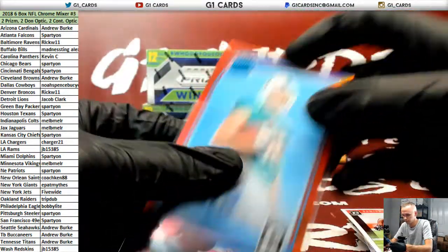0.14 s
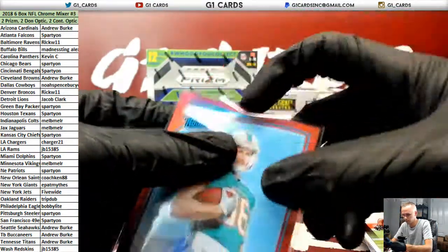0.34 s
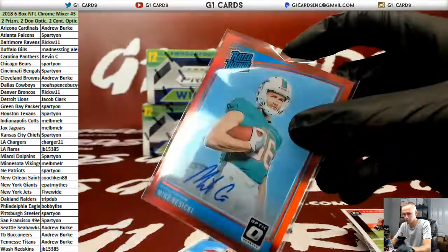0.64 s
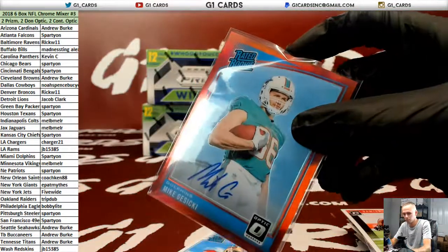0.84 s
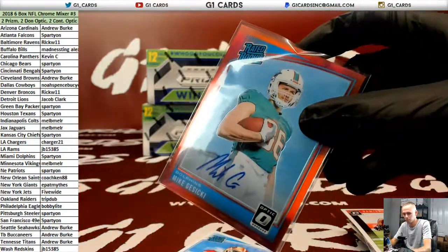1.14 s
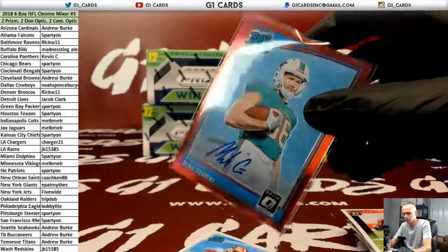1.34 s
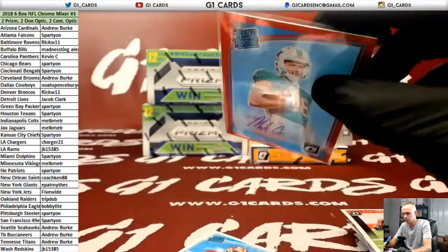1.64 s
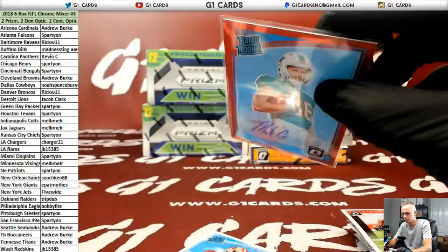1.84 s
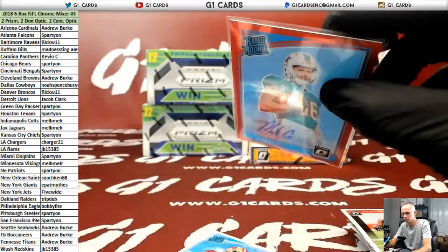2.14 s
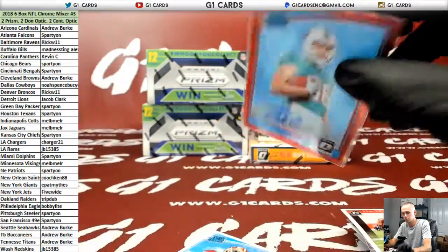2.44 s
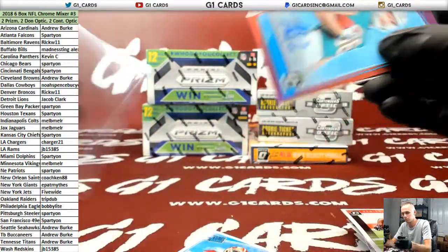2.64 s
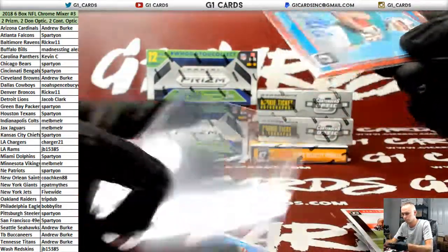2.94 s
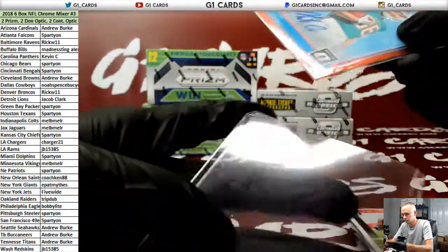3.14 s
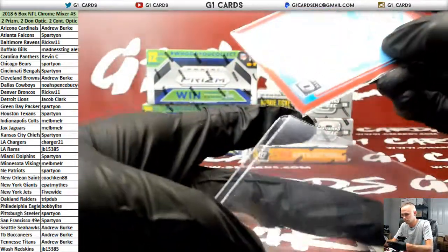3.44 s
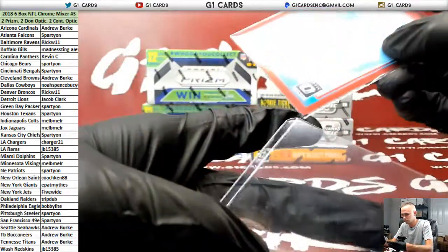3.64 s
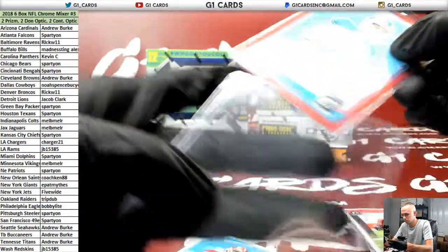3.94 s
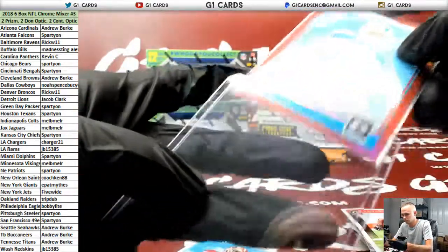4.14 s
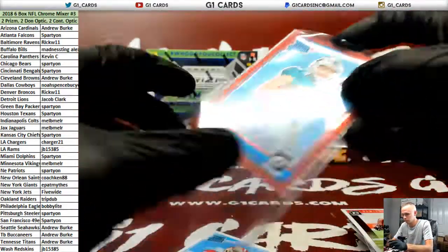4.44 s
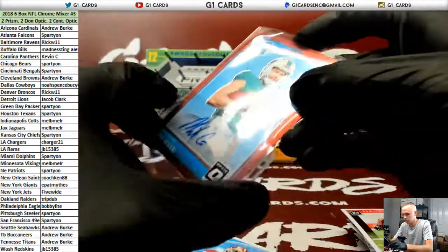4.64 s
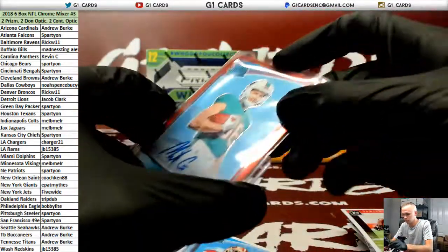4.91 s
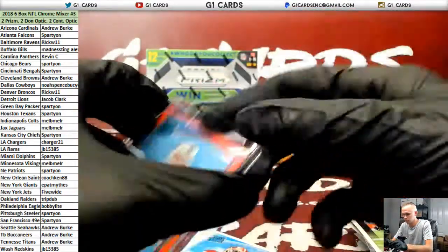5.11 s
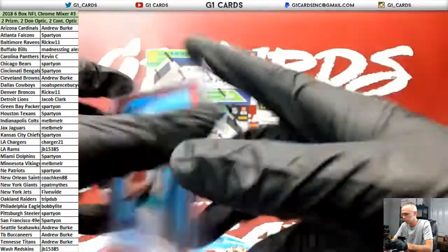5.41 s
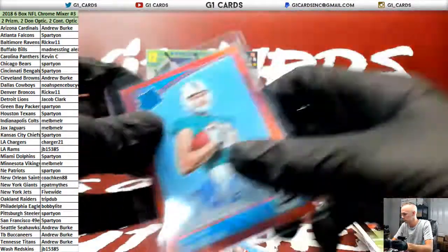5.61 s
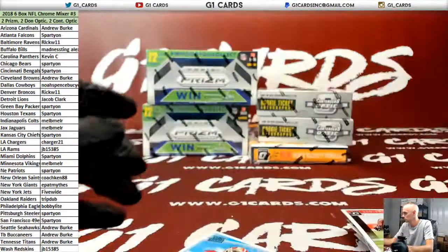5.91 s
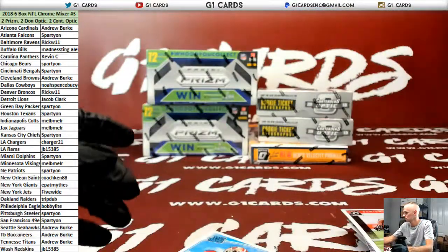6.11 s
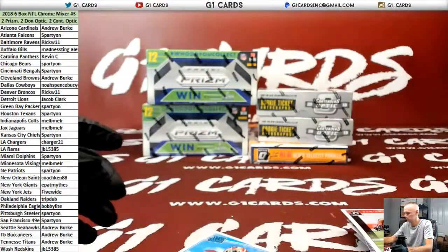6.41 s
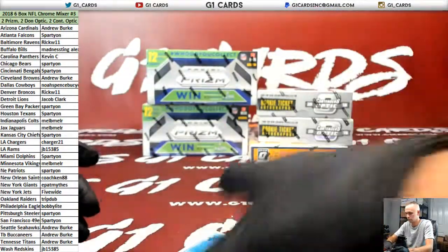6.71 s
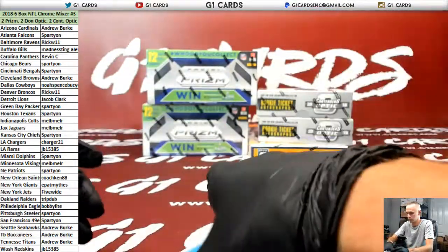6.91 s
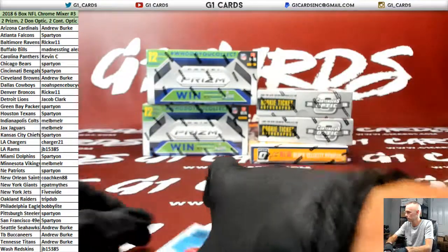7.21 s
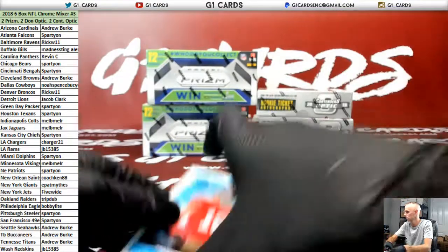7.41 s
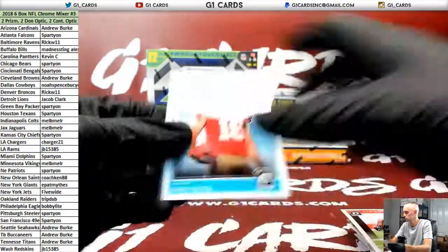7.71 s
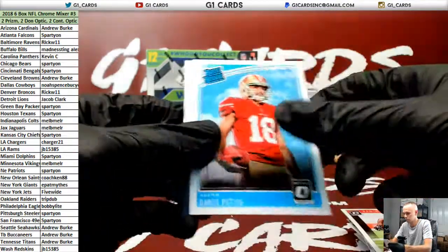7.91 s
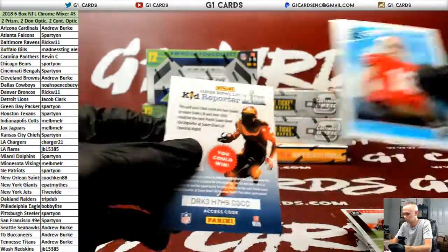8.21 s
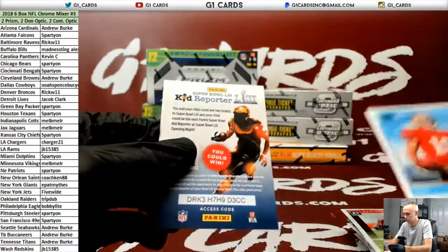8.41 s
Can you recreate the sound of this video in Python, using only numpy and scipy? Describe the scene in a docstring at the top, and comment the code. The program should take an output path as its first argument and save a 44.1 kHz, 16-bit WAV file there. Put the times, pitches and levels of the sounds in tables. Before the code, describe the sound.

Gloved hands softly handle a sleeved card over a fan's rumble; a rigid holder clacks down, and later a card snaps onto a pile.

```python
"""Soft plastic rustles and light ticks over a fan's low rumble and hum, close up in a small room.
Gloved hands are sliding a sleeved card into a rigid holder: friction makes the rustle, scrapes and
squeaks, and edges tick as they catch and let go. At about 6.1 s the holder clacks onto the table;
at about 8.5 s a card snaps down on a pile. Each landing is a quick run of contacts that ring the
object, thud into what lies beneath and echo round the room."""
import sys
import numpy as np
from scipy import signal
from scipy.fft import rfft, irfft, next_fast_len
from scipy.io import wavfile
from scipy.ndimage import uniform_filter1d, map_coordinates

SR = 44100
rng = np.random.default_rng(int(sys.argv[2]) if len(sys.argv) > 2 else 0)


def wrap_up_sound(samples):
    """Save the sound to the file named by the first command line argument, as 16-bit audio."""
    columns = np.atleast_2d(samples).T
    # keep every value between -1 and 1, then stretch to whole-number steps
    tamed = np.clip(columns, -1, 1)
    steps = np.round(tamed * 32767).astype(np.int16)
    wavfile.write(sys.argv[1], SR, steps)


N = 377496
TOP_HZ = 15800  # upper edge of the sound


def amp(db):
    """Decibels to gain."""
    return 10 ** (np.asarray(db) / 20)


def unit(x):
    """Scale to rms 1."""
    return x / np.sqrt(np.mean(x ** 2) + 1e-20)


def along(points, hz):
    """Read a curve of (freq_hz, value) points on a log-frequency axis."""
    freqs, values = np.transpose(points)
    return np.interp(np.log(hz + 1), np.log(freqs + 1), values)


def wobble(knots_per_s):
    """A smooth random drift."""
    knots = rng.standard_normal(int(N * knots_per_s / SR) + 4)
    return map_coordinates(knots, [np.arange(N) * knots_per_s / SR])


def filtered(x, response):
    """EQ x with a gain given as a function of frequency."""
    size = next_fast_len(len(x) + 4096)
    return irfft(rfft(x, size) * response(np.fft.rfftfreq(size, 1 / SR)), size)[:len(x)]


def coloured(x, spectrum):
    """EQ x with a curve of (freq_hz, gain_db) points, then scale to rms 1."""
    return unit(filtered(x, lambda hz: amp(along(spectrum, hz))))


def hump(hz, centre_hz, octaves):
    """A broad peak on the log-frequency axis."""
    return 1 / (1 + (np.log2((hz + 1) / centre_hz) / octaves) ** 2)


def add(track, start_s, sound):
    """Mix a sound into the track."""
    part = track[round(start_s * SR):][:len(sound)]
    part += sound[:len(part)]


def friction(slips_per_s, hiss):
    """Tiny slips of very uneven size over a smooth hiss."""
    slips = rng.laplace(size=N) * (rng.random(N) < slips_per_s / SR)
    return unit(unit(slips) + hiss * rng.standard_normal(N))


# Tone of the fan's rumble: freq_hz, gain_db
FAN_EQ = [(15, -6), (25, 0.5), (38, 0.5), (54, -11), (72, -6.5), (92, -14), (116, -8), (160, -17.5),
          (370, -20.5), (580, -30), (1300, -33.5), (2400, -40), (4000, -47), (16000, -58)]
# Resonances of the moving air: centre_hz, level_db, width_octaves
AIR_RESONANCES = [(436, -75.5, 0.071), (822, -74.5, 0.33)]
# Tones of the hum: pitch_hz, level_db
HUM_TONES = [(113, -67.5), (121, -70), (382, -71.5)]

def fan():
    """The bed: steady air rumble, two airy resonances and a wavering hum."""
    t = np.arange(N) / SR
    rumble = amp(-53) * coloured(rng.standard_normal(N), FAN_EQ)
    air = sum(amp(db) * unit(filtered(rng.standard_normal(N), lambda hz: hump(hz, centre_hz, octaves)))
              for centre_hz, db, octaves in AIR_RESONANCES)
    hum = sum(amp(db + 1.98 * wobble(1.5)) * np.sin(2 * np.pi * hz * t + 1.01 * wobble(9))
              for hz, db in HUM_TONES)
    return rumble + air + hum


# How long the walls ring: freq_hz, t60_s
WALL_DECAY = [(100, 0.77), (1200, 0.56), (6000, 0.5), (15000, 0.49)]

def room_tail(eq, near_t60_s, far_db, build_s):
    """Dense echoes from the desk and boxes, then the weaker ring of the walls; energy 1."""
    hz, t, spectrogram = signal.stft(rng.standard_normal(SR // 2), SR, nperseg=256)
    near = amp(-60 * t / near_t60_s)
    walls = amp(far_db - 60 * t / along(WALL_DECAY, hz)[:, None])
    tail = coloured(signal.istft(spectrogram * (near + walls), SR, nperseg=256)[1], eq)
    tail *= 1 - np.exp(-(np.arange(len(tail)) / SR / build_s) ** 2)
    return tail / np.linalg.norm(tail)


# Tone of the reverb on the handling: freq_hz, gain_db
ROOM_EQ = [(300, -3), (1500, 8.5), (3000, 2), (4800, 4.5), (7000, 5.5), (15000, 2.5)]

def in_room(x, wet_db):
    """A close sound with the small room's answer."""
    tail = room_tail(ROOM_EQ, near_t60_s=0.25, far_db=-17, build_s=0.0023)
    return x + amp(wet_db) * signal.fftconvolve(x, tail)[:N]


# Restless shifting of the grip between strokes: time_s, level_db
FIDGET = [(0, -79.5), (0.4, -73), (0.9, -84), (1.35, -74.5), (1.6, -82), (1.95, -75), (2.45, -69),
          (2.8, -74), (3.2, -90), (3.7, -88), (4.2, -70.5), (5.15, -81.5), (5.8, -70.5), (6.1, -79),
          (6.6, -76), (7.0, -76.5), (7.4, -73.5), (7.9, -81)]
# A glove brushes plastic or card: peak_s, level_db, half_width_s
GLOVE_STROKES = [(0.562, -70, .075), (0.70, -65.5, 0.012), (1.78, -73, 0.09), (2.094, -65.5, 0.037),
                 (2.232, -59, 0.025), (2.567, -65, 0.041), (3.01, -71, 0.032), (4.442, -67.5, 0.038),
                 (5.028, -62.5, .058), (5.332, -64, 0.056), (5.48, -65.5, 0.046), (5.59, -69, 0.027),
                 (6.774, -63.5, 0.026), (7.175, -72.5, .09), (7.292, -59.5, 0.035), (7.345, -63.5, 0.055),
                 (8.035, -71, 0.046), (8.099, -61, 0.02), (8.24, -72.5, 0.086)]

def glove_envelope():
    """Each stroke swells and fades as the finger speeds up and stops; its power adds to the fidgeting."""
    t = np.arange(N) / SR
    power = amp(np.interp(t, *np.transpose(FIDGET))) ** 2
    for peak_s, db, half_width_s in GLOVE_STROKES:
        power += (amp(db) * np.exp(-((t - peak_s) / half_width_s) ** 2)) ** 2
    return np.sqrt(power)


# The soft sleeve slides along a surface: start_s, length_s, level_db
SLEEVE_SLIPS = [(0.054, .12, -70), (1.72, .4, -80), (2.2, .44, -78), (3.77, .17, -70), (4.068, .11, -66),
                (4.28, .2, -80), (4.95, 0.14, -66), (5.395, .105, -75), (5.555, .07, -73),
                (6.75, .055, -71), (7.035, .2, -79), (7.27, .11, -67.5), (8.003, .11, -75)]

def sleeve_envelope(attack_s=0.012, release_s=0.009):
    """The sleeve starts to slide, keeps an even speed and stops short."""
    out, t = np.zeros(N), np.arange(SR) / SR
    for start_s, length_s, db in SLEEVE_SLIPS:
        release = np.exp(-np.maximum(t - length_s, 0) / release_s)
        add(out, start_s, amp(db) * (1 - np.exp(-t / attack_s)) * release)
    return out


def crinkled(x, depth_db):
    """Thin film buckles in patches, so single pitches flare up for a few milliseconds."""
    spectrogram = signal.stft(x, nperseg=256)[2]
    patches = uniform_filter1d(rng.standard_normal(spectrogram.shape), size=4, axis=0)
    patches = unit(uniform_filter1d(patches, size=4, axis=1))
    return unit(signal.istft(spectrogram * amp(depth_db * patches), nperseg=256)[1][:N])


# Midrange rub of the gloves and airy sizzle of the sleeve: freq_hz, gain_db
RUB_EQ = [(400, -17), (1200, 0), (2000, -2), (2900, -1), (4800, -2.5), (7000, -1.5), (9500, -11),
          (15000, -25.5)]
SLEEVE_EQ = [(4000, -36.5), (8000, -3), (11000, -5.5), (14000, -5.5), (16000, -8)]

def rustle(sleeve_drag_db=-6):
    """Grainy friction of gloves, with the finer crackle of the sleeve, which every glove move stirs."""
    glove_motion = glove_envelope()
    sleeve_motion = np.hypot(sleeve_envelope(), amp(sleeve_drag_db) * glove_motion)
    glove = crinkled(coloured(friction(slips_per_s=900, hiss=1), RUB_EQ), depth_db=3.5)
    sleeve = crinkled(coloured(friction(slips_per_s=800, hiss=1), SLEEVE_EQ), depth_db=4.5)
    flutter = amp(0.46 * wobble(60))
    return (amp(-2.5) * glove_motion * glove + amp(-4.7) * sleeve_motion * sleeve) * flutter


# Card edges scrape on plastic and each other: peak_s, level_db, half_width_s, centre_hz, width_octaves
EDGE_SCRAPES = [(2.623, -71.5, 0.047, 2700, 0.36), (4.309, -65, .026, 3030, 0.51),
                (4.435, -66, 0.0086, 3000, 0.2), (4.953, -64, 0.038, 2220, 0.77),
                (5.002, -58, 0.018, 1870, 0.33), (5.032, -56, 0.02, 1980, 0.21),
                (7.356, -65, 0.016, 1970, 0.31), (8.035, -69, 0.031, 2200, 0.9)]

def scrapes():
    """Each stroke of a card's edge swells and fades in a resonance of the thin plate."""
    out, t = np.zeros(N), np.arange(SR // 3) / SR
    middle_s = t.mean()
    grit = friction(slips_per_s=2500, hiss=0.75)
    for peak_s, db, half_width_s, centre_hz, octaves in EDGE_SCRAPES:
        scrape = filtered(grit[round(peak_s * SR):][:len(t)], lambda hz: hump(hz, centre_hz, octaves))
        swell = np.exp(-((t - middle_s) / half_width_s) ** 2)
        add(out, peak_s - middle_s, amp(db) * unit(scrape) * swell)
    return out


# Short slips of the grip: time_s, relative_level_db, fade_s, treble_tilt_db
GRIP_SCUFFS = [(1.956, -44.5, 0.011, 13), (2.216, -42, 0.028, 2), (2.535, -48.5, 0.043, 6),
               (2.5846, -39, 0.017, -6), (5.314, -41, 0.024, -9), (5.402, -41, 0.019, 17),
               (5.465, -48, 0.015, 4)]
# Tone of a scuff before its tilt: freq_hz, gain_db
SCUFF_EQ = [(500, -2), (1500, -13), (2700, -2.5), (4800, -2.5), (7500, -4), (10000, -8.5), (15500, -16)]

def scuffs(rise_s=0.0051, trim_db=-11):
    """Each slip of the grip is a short burst of friction."""
    out, t = np.zeros(N), np.arange(SR // 8) / SR
    grit = friction(slips_per_s=1700, hiss=0.5)
    for time_s, db, fade_s, tilt_db in GRIP_SCUFFS:
        burst = coloured(grit[round(time_s * SR):][:len(t)], SCUFF_EQ)
        burst = unit(filtered(burst, lambda hz: amp(tilt_db * hz / TOP_HZ)))
        envelope = (1 - np.exp(-t / rise_s)) * np.exp(-(t / fade_s) ** 2)
        add(out, time_s - rise_s, amp(db + trim_db) * burst * envelope)
    return out


# Tiny plastic squeaks: peak_s, relative_level_db, pitch_hz, half_width_s
SQUEAKS = [(2.094, -62, 2680, 0.0064), (2.641, -62, 2680, 0.0029), (3.804, -71, 5250, 0.0064),
           (3.92, -70, 6040, 0.0046), (4.087, -69, 8070, 0.012), (4.142, -66, 8600, .004),
           (4.16, -65.5, 5520, .004), (4.162, -64, 11700, .004)]

def squeaks(waver=0.044, trim_db=1.5):
    """Plastic sticks and slips, giving a short swell of an unsteady tone."""
    out, t = np.zeros(N), np.arange(SR // 8) / SR
    middle_s = t.mean()
    for peak_s, db, pitch_hz, half_width_s in SQUEAKS:
        jitter = unit(uniform_filter1d(rng.standard_normal(len(t)), size=30))
        tone = np.sin(2 * np.pi * np.cumsum(pitch_hz * (1 + waver * jitter)) / SR)
        swell = np.exp(-((t - middle_s) / half_width_s) ** 2)
        add(out, peak_s - middle_s, amp(db + trim_db) * swell * tone)
    return out


def resonance(x, hz, q):
    """Ring one resonance with x; rms 1."""
    return unit(signal.lfilter(*signal.iirpeak(hz, max(q, hz / TOP_HZ), fs=SR), x))


# Light ticks of plastic edges: start_s, relative_edge_db, centre_hz, sharpness_q, relative_film_db
EDGE_TICKS = [(0.1766, -37, 2100, .8, -53), (0.1775, -36, 9000, 0.5, -43), (0.325, -41.5, 4800, .9, -40),
              (1.401, -36, 2100, 0.7, -31.5), (1.903, -51, 4500, 1.3, -67), (2.589, -41, 3600, 1.4, -56),
              (2.6593, -39.5, 2750, 3.8, -62), (3.944, -41, 970, 3.1, -61), (4.336, -39, 3950, 1.4, -59),
              (4.5152, -44, 3200, 1.8, -67), (5.24, -54, 5100, .9, -64), (5.3103, -34, 2530, 4.9, -58),
              (5.316, -31.5, 3480, 1, -50), (5.567, -48, 3000, 0.88, -61), (6.6773, -50, 3500, 1.3, -64),
              (6.719, -50.5, 4500, .8, -55), (8.093, -45.5, 3200, 1.8, -66)]
# Resonances of the taut sleeve: centre_hz, sharpness_q, gain_db
FILM_MODES = [(800, 3.8, -5), (7630, 6, 5), (12000, 1.1, -14)]

def ticks(grit_db=-13, grit_t60_s=0.018, wet_db=-7, trim_db=-35.5):
    """Edges catch and let go: a gritty snap and its echo ring one broad resonance and the sleeve's film."""
    out = np.zeros(N)
    for start_s, edge_db, centre_hz, edge_q, film_db in EDGE_TICKS:
        tail = room_tail(ROOM_EQ, near_t60_s=0.16, far_db=-21, build_s=0.0032)
        t = np.arange(len(tail)) / SR
        snap = (t == 0) + rng.standard_normal(len(t)) * amp(grit_db - 60 * t / grit_t60_s)
        snap = snap / np.linalg.norm(snap) + amp(wet_db) * tail
        edge = resonance(snap, centre_hz, edge_q)
        film = unit(sum(amp(db) * resonance(snap, hz, q) for hz, q, db in FILM_MODES))
        add(out, start_s, amp(trim_db) * (amp(edge_db) * edge + amp(film_db) * film))
    return out


def ring(modes, t, contact_hz=None):
    """Damped modes of alternating sign; a contact favours those near its own frequency."""
    hz, db, t60_s = np.transpose(modes)[:, :, None]
    drive = 1 if contact_hz is None else hump(hz, contact_hz, octaves=1.0)
    sign = (-1) ** np.arange(len(modes))[:, None]
    decay = amp(db + rng.normal(0, 1, db.shape) - 60 * t / t60_s)
    return np.sum(sign * drive * decay * np.sin(2 * np.pi * hz * t), axis=0)


# Tone of the noisy crack at the front of each hit: freq_hz, gain_db
CRACK_EQ = [(250, 15), (900, -11), (2200, 8), (4500, -4), (7500, 0.5), (10000, -12.5), (15500, -8)]

def landing(hits, modes, support_modes, attack_s, thud_attack_s, crack_db, crack_t60_s, drag_db):
    """Each contact rings the object and thuds into its support; until it lies flat the edge drags."""
    out, t = np.zeros(N), np.arange(SR // 3) / SR
    for start_s, db, contact_hz, thud_db in hits:
        crack = coloured(rng.standard_normal(len(t)), CRACK_EQ)
        crack = filtered(crack, lambda hz: hump(hz, contact_hz, octaves=1.46))
        crack *= amp(crack_db - 60 * t / crack_t60_s)
        body = (ring(modes, t, contact_hz) + crack) * (1 - np.exp(-t / attack_s))
        thud = amp(thud_db) * ring(support_modes, t) * (1 - np.exp(-t / thud_attack_s))
        add(out, start_s, amp(db) * (body + thud))
    drag_span_s = [hits[0][0] - 0.02, hits[-1][0]]
    swell_db = np.interp(np.arange(N) / SR, drag_span_s, [drag_db - 29.5, drag_db], left=-120, right=-120)
    return out + amp(swell_db) * coloured(friction(slips_per_s=5900, hiss=0.62), RUB_EQ)


def echoes(hits, eq, wet_db, near_t60_s, far_db, build_s):
    """Every hit radiates all round and starts its own diffuse tail."""
    out = np.zeros(N)
    for start_s, db, *_ in hits:
        add(out, start_s, amp(db + wet_db) * room_tail(eq, near_t60_s, far_db, build_s))
    return out


# The card meets the pile: start_s, level_db, contact_hz, relative_thud_db
CARD_HITS = [(8.4298, -28.5, 1800, -16), (8.4325, -36, 1000, -19), (8.4515, -22, 1600, -14),
             (8.4537, -24, 2600, -22), (8.4608, -7.5, 5500, -34), (8.4619, -4, 3600, -33),
             (8.4648, -17, 1100, 2)]
# Ring of the card and soft thud of the pile: pitch_hz, gain_db, t60_s
CARD_MODES = [(397, -12, 0.021), (806, -8.5, 0.013), (1270, -7, 0.009), (2970, -11.5, 0.0057),
              (3900, -5, 0.0063), (5600, -17, 0.0069), (7660, -13.5, 0.0088), (12300, -14, 0.0026)]
PILE_MODES = [(81, -19, 0.31), (113, -8, 0.065), (249, -18.5, 0.04)]
# Tone of the snap's reverb: freq_hz, gain_db
CARD_ECHO_EQ = [(60, 11.5), (180, 4), (330, -2), (600, -6), (1100, -3), (1800, -4.5), (2600, -3.5),
                (3950, 0), (4800, -5.5), (5700, -2), (8300, -7.5), (10000, -16.5), (15500, -22)]

def card_snap():
    """A card's edge touches the pile, then the card snaps flat."""
    close = landing(CARD_HITS, CARD_MODES, PILE_MODES, attack_s=0.00014, thud_attack_s=0.0043,
                    crack_db=-7, crack_t60_s=0.0096, drag_db=-67)
    room = echoes(CARD_HITS, CARD_ECHO_EQ, wet_db=-1.5, near_t60_s=0.1, far_db=-15, build_s=0.0057)
    return close + room


# The holder meets the table: start_s, level_db, contact_hz, relative_thud_db
HOLDER_HITS = [(6.1058, -32, 2400, 5.5), (6.1486, -3.5, 3400, -19), (6.1511, -12.5, 6500, -12),
               (6.1555, -6.5, 1460, -4.5)]
# Ring of the rigid plastic and knock of the table: pitch_hz, gain_db, t60_s
HOLDER_MODES = [(1160, -4, 0.0097), (1710, -2.5, 0.0061), (2190, -0.5, 0.005), (2920, -11, 0.0093),
                (4640, -13, .003), (6030, 3, 0.0025), (7670, -7, 0.0027)]
TABLE_MODES = [(75, -34, 0.14), (281, -27, 0.21), (345, -16.5, 0.015), (448, -5.5, 0.011),
               (735, -14, 0.005)]
# Tone of the clack's reverb: freq_hz, gain_db
HOLDER_ECHO_EQ = [(60, -2.5), (180, -5), (290, 2), (490, 1), (700, -7), (1020, -3), (1500, -3), (2300, -8),
                  (4300, -11.5), (6500, -12), (8500, -18), (10500, -29), (15500, -38)]

def holder_clack():
    """The rigid holder touches the table lightly, then lands in three quick hits."""
    close = landing(HOLDER_HITS, HOLDER_MODES, TABLE_MODES, attack_s=0.0005, thud_attack_s=0.0011,
                    crack_db=-14.5, crack_t60_s=0.019, drag_db=-49)
    room = echoes(HOLDER_HITS, HOLDER_ECHO_EQ, wet_db=4, near_t60_s=0.12, far_db=-17.5, build_s=0.0054)
    return close + room


def scene():
    """The two landings, the handling and the fan, in one small room."""
    landings = holder_clack() + card_snap()
    handling = in_room(rustle() + scrapes() + scuffs() + squeaks(), wet_db=-6.5) + ticks()
    return (landings + handling + fan())[None]


def record(dry):
    """The microphone channel cuts off steeply above its band limit."""
    return filtered(dry[0], lambda hz: 1 / (1 + (hz / TOP_HZ) ** 120))[None]


dry = scene()
out = record(dry)
wrap_up_sound(out)
```